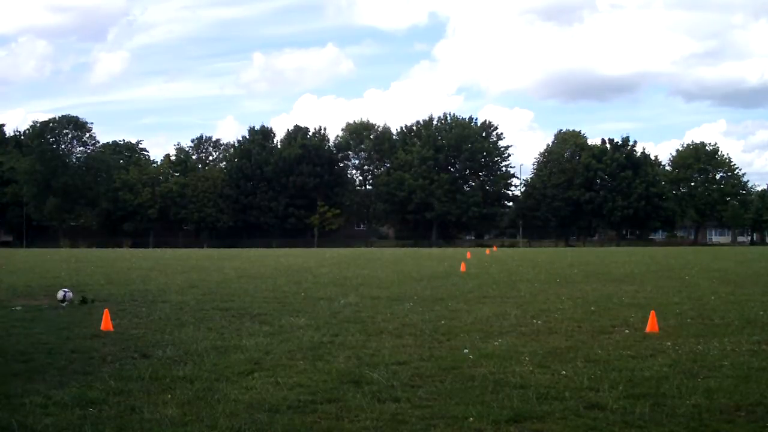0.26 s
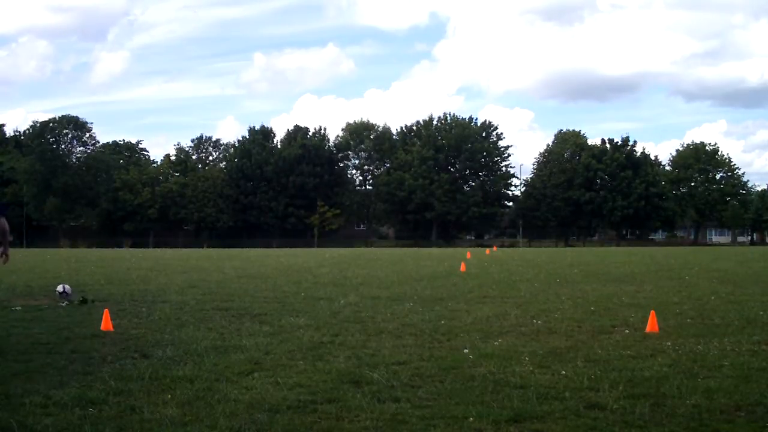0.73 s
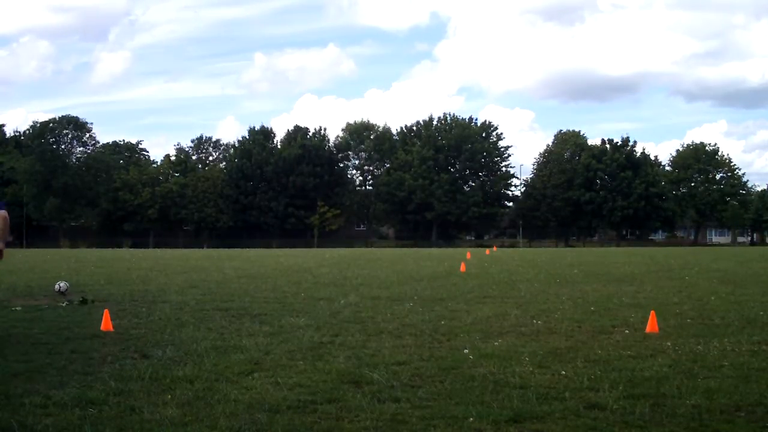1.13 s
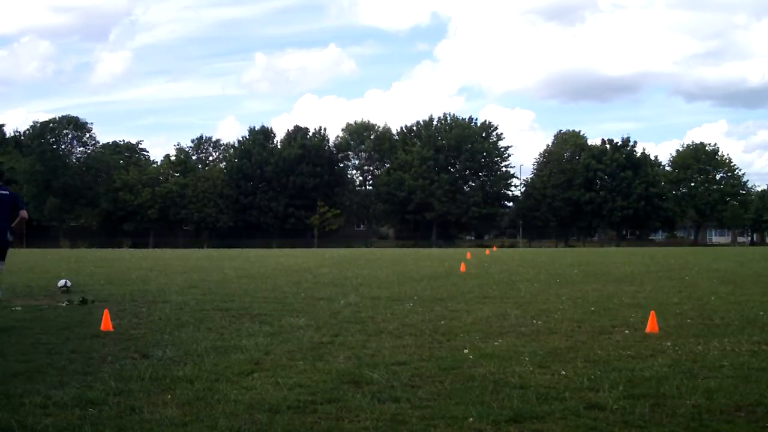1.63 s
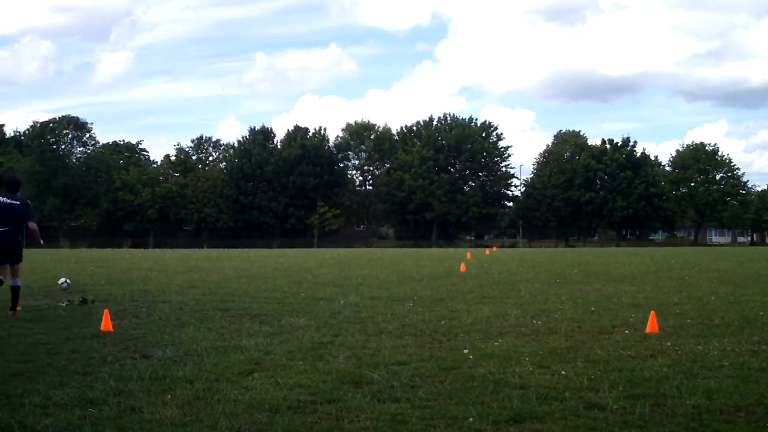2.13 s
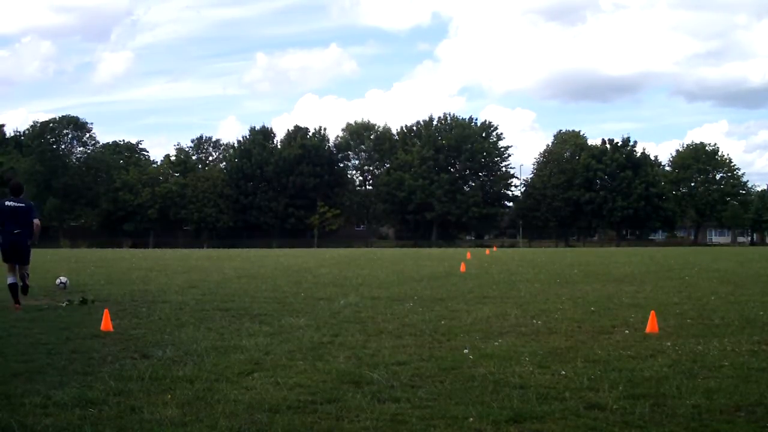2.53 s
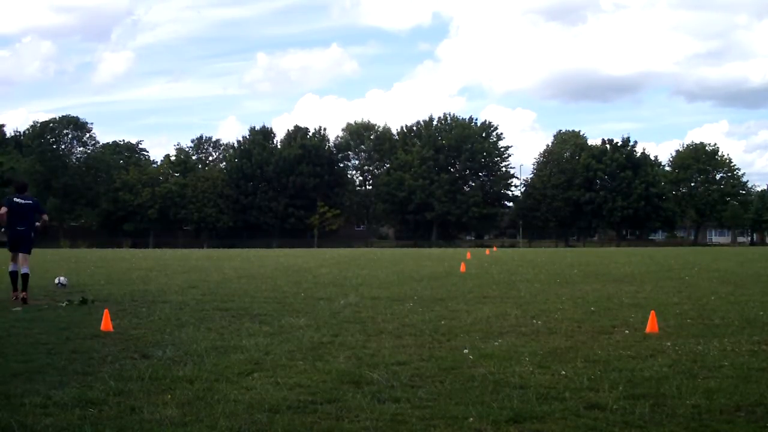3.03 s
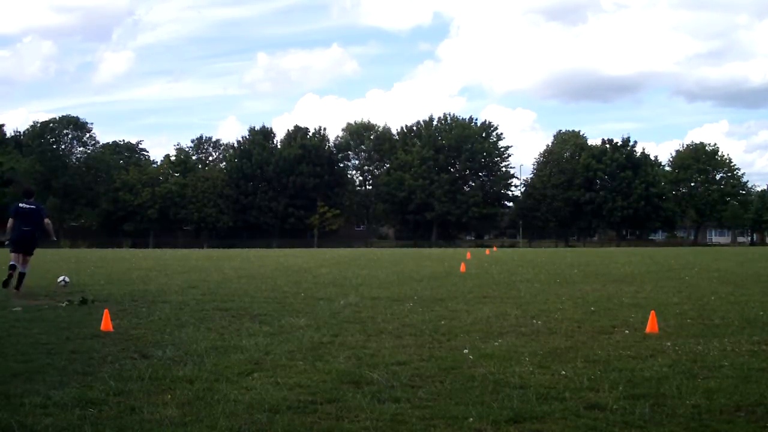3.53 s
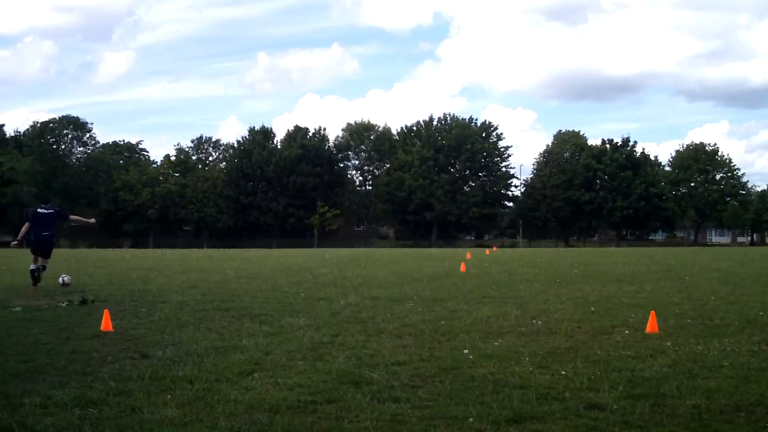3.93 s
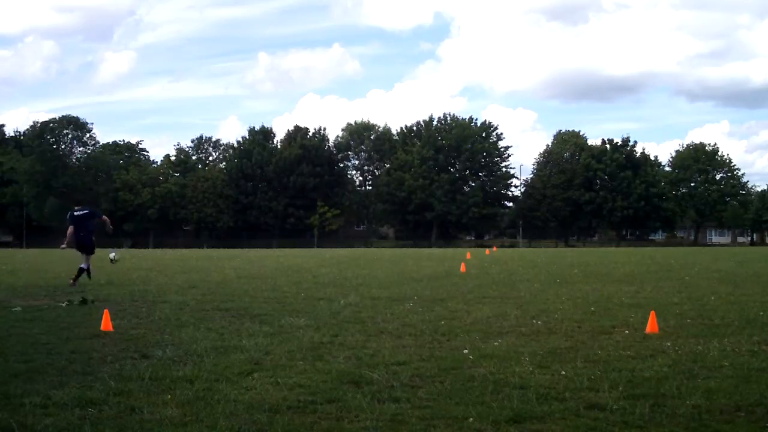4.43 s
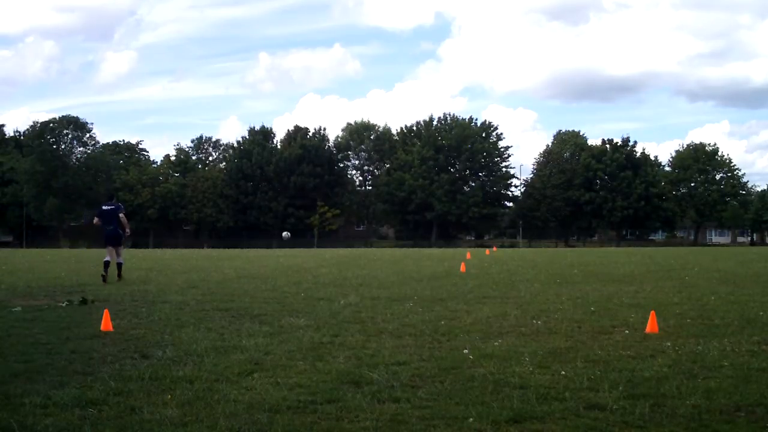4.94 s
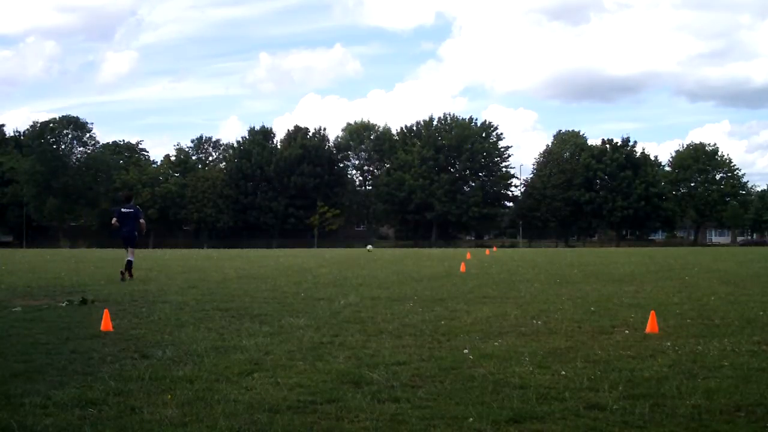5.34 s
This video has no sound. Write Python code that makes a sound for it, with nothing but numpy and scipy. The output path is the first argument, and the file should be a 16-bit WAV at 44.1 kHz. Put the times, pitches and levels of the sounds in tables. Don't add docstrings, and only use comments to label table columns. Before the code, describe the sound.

Wind buffets a microphone in an open field, a small bird chirps and trills, then a boot sharply strikes a ball.

```python
import sys
import numpy as np
from scipy import signal
from scipy.fft import rfft, irfft, next_fast_len
from scipy.io import wavfile
from scipy.ndimage import uniform_filter1d, map_coordinates

SR = 44100
rng = np.random.default_rng(int(sys.argv[2]) if len(sys.argv) > 2 else 0)


def nominal_scale(level):
    x = np.asarray(level, float) / 20
    return 10 ** x


def generate_wav(sig):
    pcm = np.round(np.clip(np.atleast_2d(sig).T, -1, 1) * 32767).astype(np.int16)
    wavfile.write(sys.argv[1], SR, pcm)


N = 245637


def unit(x):
    return x / np.sqrt(np.mean(x ** 2) + 1e-20)


def curves(rows):
    s, *cols = np.transpose(rows)
    return [np.interp(np.arange(N) / SR, s, c) for c in cols]


def wobble(rate):
    points = rng.standard_normal(int(N * rate / SR) + 4)
    return map_coordinates(points, [np.arange(N) * rate / SR])


def swells(rows, length):
    out = np.zeros((len(rows[0]) - 1, N))
    for s, *lifts in rows:
        for track, db in zip(out, lifts):
            add(track, s - length / 2, db * np.hanning(round(length * SR)))
    return out


def rush(spectrum, patchy_db):
    z = signal.stft(rng.standard_normal(N), nperseg=512)[2]
    field = uniform_filter1d(rng.standard_normal(z.shape), size=5, axis=0)
    field = uniform_filter1d(field, size=12, axis=1)
    x = signal.istft(z * nominal_scale(patchy_db * unit(field)), nperseg=512)[1][:N]
    m = next_fast_len(N + 8192)
    hz, db = np.transpose(spectrum)
    log_hz = np.log(np.fft.rfftfreq(m, 1 / SR) + 1)
    gain = nominal_scale(np.interp(log_hz, np.log(hz + 1), db, -120, -120))
    return unit(irfft(rfft(x, m) * gain, m)[:N])


def steadied(x, span):
    swell = np.abs(uniform_filter1d(x ** 2, size=round(span * SR))) + 0.062
    return unit(x / swell ** 0.41)


def add(track, s, sound):
    part = track[round(s * SR):][:len(sound)]
    part += sound[:len(part)]


def ring(hz, db, t60, attack):
    t = np.arange(SR // 4) / SR
    return nominal_scale(db - 60 * t / t60) * (1 - np.exp(-t / attack)) * np.sin(2 * np.pi * hz * t)


def wind():
    # (time [s], strength [dB])
    strength = [(0.0, -34.5), (0.12, -35), (0.65, -30), (0.9, -33.5), (1.36, -37), (1.97, -36), (2.53, -35),
                (2.95, -39.5), (3.18, -35), (4.11, -38), (4.36, -38), (5.01, -39), (5.14, -35.5),
                (5.57, -41)]
    # (time [s], lift of the buffet [dB], lift of flutter and flap [dB])
    puffs = [(.146, 6.5, 0.5), (.254, 7, -5), (.4, -5, 3.5), (.93, 3.5, 3.5), (1.08, 5.5, 4.5),
             (1.42, -4, 8), (1.6, 7.5, 7.5), (1.74, 6, 2), (1.88, -1, -3), (2.66, -4.5, -5.5),
             (.8, -1, -0.5), (2.03, 3.5, 2), (2.2, 1, 3.5), (2.51, 7, 4), (2.8, 1.5, 3.5),
             (2.96, 4.5, -0.5), (3.22, -3, 5), (3.4, -4.5, 1), (3.62, 2.5, 1.5), (3.8, 3.5, 1),
             (4.3, 6, 1.5), (4.65, 3, -2.5), (4.8, 3.5, 1), (2.32, 1.5, 7), (5.0, 12.5, 1), (5.23, 6, -1),
             (5.36, 8.5, -2), (5.5, 4, 5)]
    # (pitch [Hz], level [dB per Hz])
    buffet_colour = [(2, -26), (5, -30), (21, 7), (37, 0.5), (50, -3), (70, -26), (120, -60)]
    flutter_colour = [(25, -41), (45, -24.5), (55, 9), (75, -3.5), (105, -10.5), (140, -25.5), (250, -70)]
    flap_colour = [(60, -42), (100, -1), (120, 1), (160, -3), (230, -10.5), (350, -18.5), (700, -44)]
    # (time [s], pitch [Hz], peak [dB], time to fall 60 dB [s], push +1 or pull -1)
    eddies = [
        (.485, 24, -18, .07, 1),
        (.509, 30, -7, .22, -1),
        (.586, 105, -15, .06, 1),
        (.605, 60, -15, .05, 1),
        (.63, 17, -16, .15, -1),
        (.696, 30, -12.5, .18, -1),
        (1.574, 62, -18, .07, -1),
        (1.6, 75, -20, .05, -1),
        (1.945, 15, -19, .5, -1),
        (2.022, 27, -19, .12, -1),
    ]
    strength_db, = curves(strength)
    mean_db = strength_db.mean()
    gust_db = strength_db - mean_db
    deep_db, quick_db = swells(puffs, length=0.15)
    lumps = wobble(25)

    buffet = steadied(rush(buffet_colour, patchy_db=-3.0), span=0.085)
    out = nominal_scale(gust_db + deep_db - 1.0) * buffet
    flutter = unit(nominal_scale(1.56 * lumps) * steadied(rush(flutter_colour, patchy_db=0.2), span=0.079))
    out += nominal_scale(-4.5 + 0.52 * gust_db + quick_db) * flutter
    flap = unit(nominal_scale(2.4 * lumps) * steadied(rush(flap_colour, patchy_db=1.0), span=0.038))
    out += nominal_scale(-14.5 + 0.78 * gust_db + 0.38 * quick_db) * flap
    out *= nominal_scale(mean_db)
    for s, hz, db, t60, sign in eddies:
        add(out, s, sign * ring(hz, db, t60, attack=0.22 / hz))
    return out


def field():
    # (time [s], strength [dB])
    breeze = [(0.0, -53.5), (0.84, -54), (1.38, -55.5), (1.95, -54.5), (2.6, -56), (3.16, -55.5),
              (3.65, -56.5), (4.42, -57.5), (4.67, -59), (5.57, -58.5)]
    # (time [s], lift [dB])
    rustles = [
        (.25, 6.5),
        (.5, -7),
        (.74, 7),
        (1.0, 4),
        (1.19, 7.5),
        (1.6, 3),
        (1.92, 6),
        (3.33, 5),
        (4.9, -2),
    ]
    # (pitch [Hz], level [dB per Hz])
    road_colour = [(120, -9), (220, -2.5), (300, -4), (400, -6), (600, -7.5), (950, -3), (1200, -5.5),
                   (1500, -12.5), (2200, -25), (4000, -43)]
    leaf_colour = [(900, -41), (1500, -1), (2000, 1), (2800, -6.5), (3600, -8.5), (4800, -14.5),
                   (7000, -28.5), (11000, -43)]
    treetop_colour = [(3000, -26), (4500, -21), (7000, 4), (10000, 1), (13000, -10), (15000, -24)]
    breeze_db, = curves(breeze)
    breeze_db = breeze_db - breeze_db.mean()
    shake_db, = swells(rustles, length=0.14)

    road = nominal_scale(-48.5 + 0.21 * wobble(1.6)) * rush(road_colour, patchy_db=0.67)
    leaves_db = -57 + 1.4 * breeze_db + 0.28 * shake_db + 0.39 * wobble(6.03)
    leaves = nominal_scale(leaves_db) * rush(leaf_colour, patchy_db=-0.2)
    tops_db = -80 + 1.4 * breeze_db + 1.55 * shake_db + 1.8 * wobble(3.9)
    return road + leaves + nominal_scale(tops_db) * rush(treetop_colour, patchy_db=0.5)


def camera():
    # (pitch [Hz], rms level [dB])
    clocks = [(7493, -89), (7867, -74), (9000, -88), (10000, -92), (12000, -89)]
    # (time into the cycle [s], length [s], level [dB])
    writes = [
        (0.074, .028, -74),
        (.283, .022, -69),
        (.377, 0.03, -70),
        (.485, .025, -73),
    ]
    # (pitch [Hz], level [dB per Hz])
    circuit_colour = [(300, 3.5), (2000, -2.5), (5000, 0.5), (7000, 1.5), (9000, -0.5), (12500, -0.5),
                      (13500, 3), (15100, -0.5), (15300, -60)]
    pictures_per_s = 30000 / 1001
    t = np.arange(N) / SR
    frame = t * pictures_per_s % 1

    short, long = np.abs(frame - .29) < .1, np.abs(frame - .78) < .15
    gate = uniform_filter1d(0.37 * short + long, size=60)
    flip = np.sign(np.sin(np.pi * (t * pictures_per_s - .03)))
    whine = nominal_scale(-70) * gate * flip * np.sin(2 * np.pi * 15000 * t)

    lines = sum(np.sqrt(2) * nominal_scale(db + 0.6 * wobble(30)) * np.sin(2 * np.pi * hz * t) for hz, db in clocks)

    since = (frame - .36) % 1 / pictures_per_s
    tick_colour = [(6000, -24), (8500, -14), (9300, 13), (10500, -14), (14000, -15), (15000, -35)]
    ticks = nominal_scale(-60.5 - 60 * since / 0.0092) * rush(tick_colour, patchy_db=1.0)

    busy = np.zeros(N)
    for start in np.arange(0, N / SR, 15 / pictures_per_s):
        for s, length, db in writes:
            level = nominal_scale(db + 1.5 * rng.standard_normal())
            add(busy, start + s, level * np.hanning(round(1.5 * length * SR)) ** 0.34)
    spurt_colour = [(7500, -27), (9200, 1), (10000, -12), (11000, 4), (12500, -16)]
    spurts = busy * rush(spurt_colour, patchy_db=3.3)

    shared = nominal_scale(-64) * rush(circuit_colour, patchy_db=1.4)
    own = np.array([rush(circuit_colour, patchy_db=2.5), rush(circuit_colour, patchy_db=2.5)])
    return whine + lines + ticks + spurts + shared + nominal_scale(-71.0) * own


def scatter(x, t60):
    t = np.arange(SR // 3) / SR
    tail = rng.standard_normal(len(t)) * nominal_scale(-60 * t / t60)
    return signal.fftconvolve(x, tail / np.linalg.norm(tail))[:N]


def whistle(length, middle_hz, glide, bow_hz, db):
    u = np.linspace(-.5, .5, round(length * SR))
    turns = np.cumsum(middle_hz + glide * length * u - 4 * bow_hz * u ** 2) / SR
    return nominal_scale(db) * np.abs(np.cos(np.pi * u)) ** 0.75 * np.sin(2 * np.pi * turns)


def trill():
    top_hz, rest_hz, sink_s = 6150, 1700, .12
    swell_s, hold_s, fade_db_per_s = .075, .045, 550
    t = np.arange(N) / SR - 3.4
    height = (top_hz - rest_hz) * np.exp(-np.maximum(t, 0) / sink_s)
    warble = 2 * np.pi * (77 * t + 400 * np.clip(t, 0, 1) ** 3) + .25 * wobble(45)
    rise_db = 13 * np.minimum(t / swell_s - 1, 0) + fade_db_per_s * np.minimum(t, 0)
    fall_db = fade_db_per_s * np.minimum(swell_s + hold_s - t, 0)
    throb = 1 + 0.65 * np.cos(warble - .6)
    level = nominal_scale(-50.5 + rise_db + fall_db + 2.2 * wobble(70)) * throb
    pitch_hz = rest_hz + height * (1 - .12 * np.cos(warble))
    return level * np.sin(2 * np.pi * np.cumsum(pitch_hz) / SR)


def bird():
    # (time [s], length [s], start pitch [Hz], end pitch [Hz], peak [dB])
    opening = [(1.698, .016, 5100, 5300, -63), (1.972, .02, 4150, 5260, -53.5),
               (2.139, 0.02, 5950, 6150, -51.5), (2.205, .015, 4100, 4800, -61),
               (2.262, 0.06, 5950, 6360, -54), (2.297, .107, 6300, 6160, -58.5),
               (2.4, .04, 6240, 6240, -67), (2.488, .016, 4660, 5430, -57.5), (2.52, .015, 2870, 3930, -53),
               (2.555, .013, 2700, 3180, -58), (2.59, .03, 3750, 4280, -60), (3.287, .03, 5600, 5450, -65)]
    # (time [s], length [s], middle pitch [Hz], peak [dB])
    flicks = [(2.655, .01, 6700, -53), (2.774, .011, 6900, -53.5), (2.891, .011, 6830, -52.5),
              (3.012, .007, 7000, -62), (3.246, .008, 6750, -55)]
    rises = [(2.68, 0.022, 5580, -54.5), (2.798, .018, 5400, -51.5), (2.919, .016, 5400, -54),
             (3.03, 0.022, 5280, -52), (3.151, 0.0216, 5320, -54), (3.273, .013, 5450, -54)]
    falls = [(2.714, 0.022, 3500, -49), (2.831, .024, 3440, -49), (2.951, 0.023, 3500, -46),
             (3.065, .027, 3460, -45.5), (3.185, .026, 3510, -43), (3.299, 0.025, 3480, -44)]
    # (glide [Hz per s], bow [Hz])
    glides = [
        (-118000, -280),
        (44996, 62),
        (-47000, -23),
    ]
    arch_hz = 30
    out = trill()
    for s, length, start_hz, end_hz, db in opening:
        middle_hz = (start_hz + end_hz) / 2 + arch_hz
        add(out, s, whistle(length, middle_hz, (end_hz - start_hz) / length, arch_hz, db))
    for notes, (glide, bow_hz) in zip((flicks, rises, falls), glides):
        for s, length, hz, db in notes:
            add(out, s, whistle(length, hz, glide, bow_hz, db))
    out *= nominal_scale(0.37 * wobble(90))
    return out + nominal_scale(-11.5) * scatter(out, t60=.4)


def kick():
    # (pitch [Hz], level [dB per Hz])
    slap_colour = [(500, -37), (1500, 4), (2500, 7), (4500, -6), (6000, -10), (8000, 2), (11000, -6),
                   (15000, -16), (16500, -42)]
    scuff_colour = [(300, -20), (700, 0), (1500, 1), (3000, -4), (6000, -9), (10000, -12), (13000, -18),
                    (14500, -40)]
    # (pitch [Hz], level [dB], time to fall 60 dB [s])
    panels = [(890, -27, 0.021), (1430, -34, 0.01), (2040, -21, 0.0031), (2700, -27.5, 0.0066),
              (3280, -29, 0.0098), (4100, -35.5, 0.013), (4940, -28, 0.009), (5400, -27.5, 0.0092),
              (7000, -25.5, 0.0051), (8350, -33, 0.011), (9870, -35, 0.0042), (11440, -29, 0.0045),
              (13800, -36, .006)]
    touch = 4.4937
    out = np.zeros(N)
    t = np.arange(round(.0152 * SR)) / SR
    swing = np.sin(2 * np.pi * 84 * (t - .0039))
    squash = np.where(swing > 0, swing, 0.67 * np.tanh(1.56 * swing))
    edges = np.clip(t / .001, 0, 1) * np.clip((t[-1] - t) / .001, 0, 1)
    add(out, touch, nominal_scale(-9.0) * squash * edges)
    add(out, touch + 0.00016, -ring(360, -23.5, 0.02, attack=0.00023))
    add(out, touch + .0149, ring(680, -19, .008, attack=.0003))

    after = np.maximum(np.arange(N) / SR - touch, 0)
    burst = nominal_scale(-33 - 60 * after / .016) * (1 - np.exp(-after / .0005))
    slap = burst * rush(slap_colour, patchy_db=3.0)
    for hz, db, t60 in panels:
        add(slap, touch + 1.3 / hz, ring(hz, db, t60, attack=0.0004))

    drag = nominal_scale(-44.5 - 60 * after / 0.1) * (1 - np.exp(-after / 0.0015))
    scuff = drag * rush(scuff_colour, patchy_db=0.0)

    dull = signal.butter(2, [130, 2800], "bandpass", fs=SR)
    far = signal.lfilter(*dull, slap + 0.48 * out)
    echo = np.pad(scatter(far, t60=.26), (round(.032 * SR), 0))[:N]
    return out + slap + scuff + nominal_scale(-7) * echo


def scene():
    return wind() + field() + camera() + bird() + kick()


def drop_faint_treble(x):
    # (pitch [Hz], level [dB])
    weakest = [(7000, -125), (9500, -103), (11000, -93.5), (12500, -94.5), (13600, -82.5), (14600, -89),
               (14800, -110)]
    hz, t, z = signal.stft(x, SR, window="cosine", nperseg=1024)
    band = (hz / 650).astype(int)
    jumps_db = 2.3 * rng.standard_normal(len(t))
    jumps_db = jumps_db + 1.5 * rng.standard_normal((band[-1] + 1, len(t)))[band]
    least = nominal_scale(np.interp(hz, *np.transpose(weakest), -200, -200)[:, None] + jumps_db)
    kept = z * (hz < 15150)[:, None] / (1 + (least / (np.abs(z) + 1e-12)) ** 8)
    return signal.istft(kept, SR, window="cosine", nperseg=1024)[1][:, :N]


def band_limit(x):
    return signal.sosfilt(signal.butter(12, 16490, fs=SR, output="sos"), x)


def record(dry):
    offset = [
        [-.0816],
        [.0774],
    ]
    mix = drop_faint_treble(dry) + np.array(offset)
    return band_limit(mix)


dry = scene()
out = record(dry)
generate_wav(out)
```